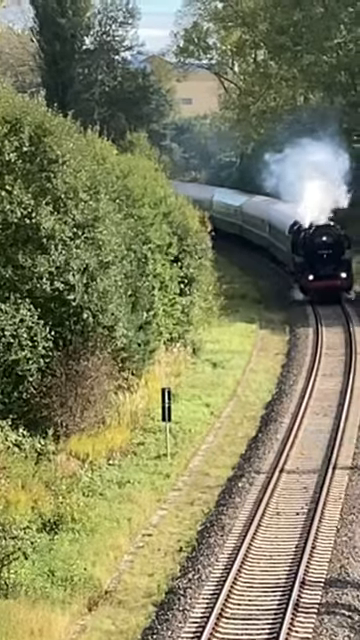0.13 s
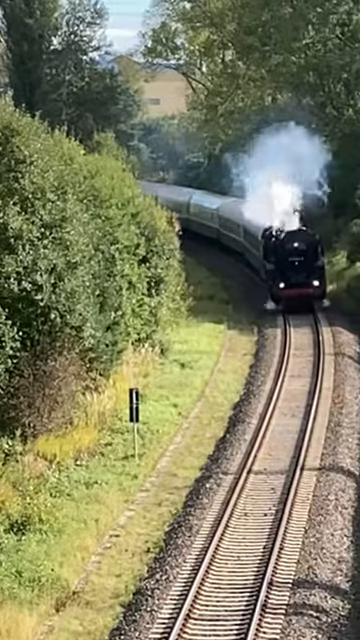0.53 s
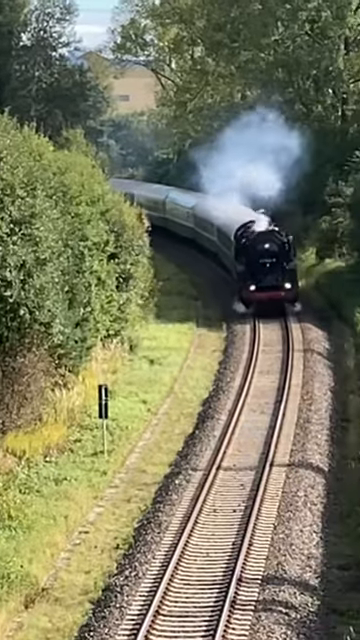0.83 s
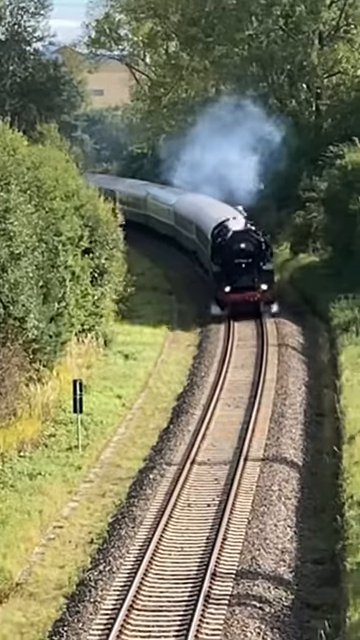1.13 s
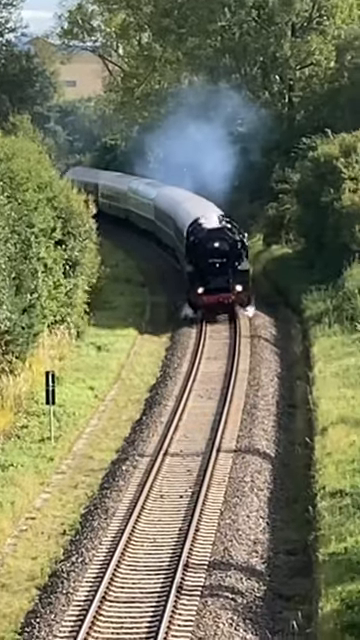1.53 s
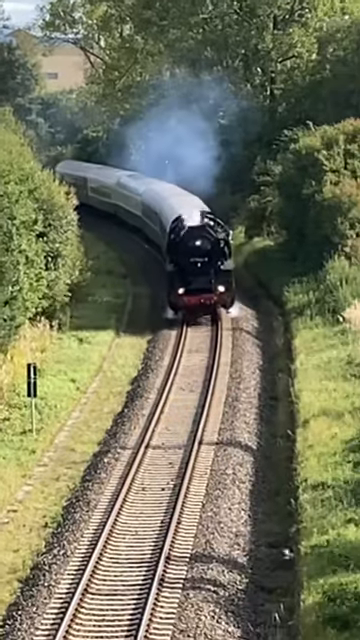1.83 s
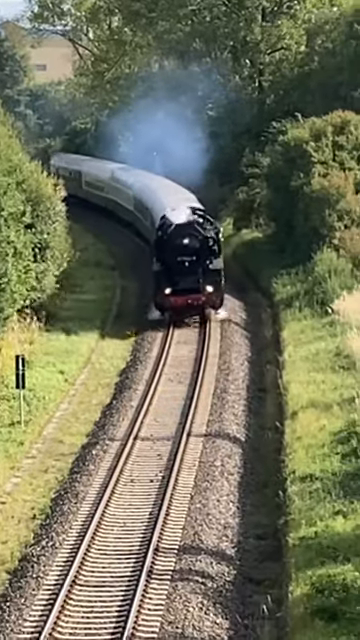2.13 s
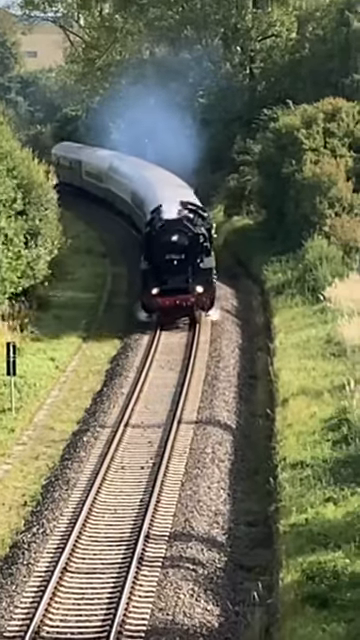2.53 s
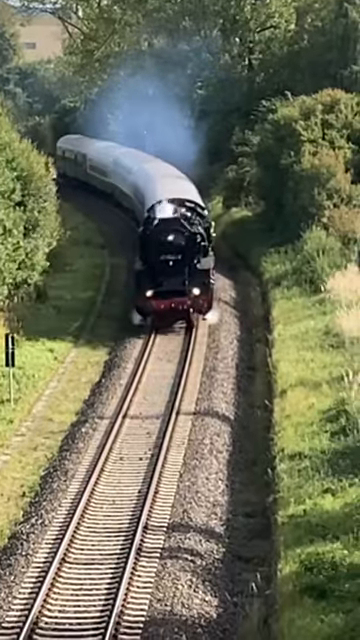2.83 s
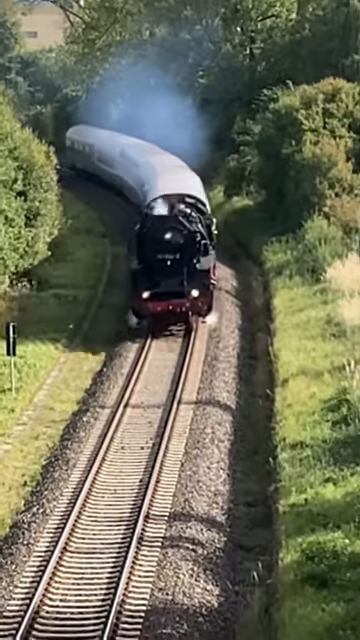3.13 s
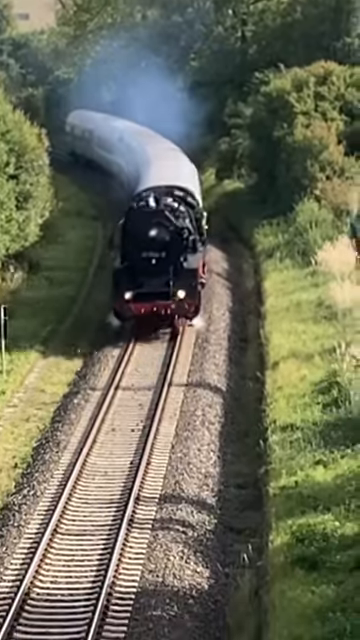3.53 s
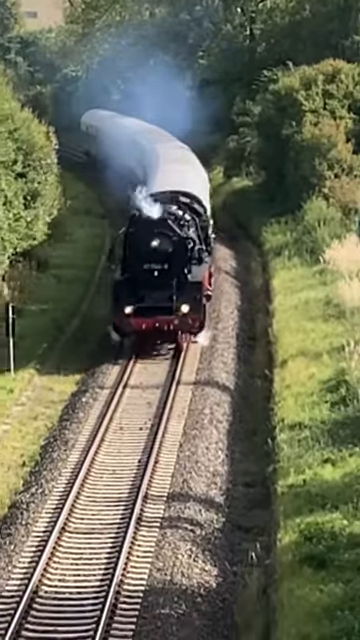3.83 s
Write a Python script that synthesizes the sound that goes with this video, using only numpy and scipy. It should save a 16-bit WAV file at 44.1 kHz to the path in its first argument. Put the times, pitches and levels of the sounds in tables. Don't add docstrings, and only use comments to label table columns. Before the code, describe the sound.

A steam locomotive's whistle blows at once, a hooting mid-pitched tone with hiss, dips and swells, stops after about a second and echoes off trees; then a much quieter rumble and steam hiss slowly approach outdoors.

```python
import sys
import numpy as np
from scipy import signal
from scipy.fft import rfft, irfft, next_fast_len
from scipy.io import wavfile
from scipy.ndimage import uniform_filter1d, map_coordinates

SR = 44100
rng = np.random.default_rng(int(sys.argv[2]) if len(sys.argv) > 2 else 0)


def ratio_of_db(decibels):
    return 10 ** (np.asarray(decibels, float) / 20)


def store_pcm(level_fs):
    pcm = np.round(np.clip(level_fs, -1, 1) * 32767).astype(np.int16)
    wavfile.write(sys.argv[1], SR, np.atleast_2d(pcm).T)


N = 176400
LEAD = 1
M = N + LEAD * SR

# (time [s], pitch [Hz], tone level [dB])
VALVE_OPENING = [
    (0, 451, -24),
    (.06, 451, -14.5),
    (.23, 451, -14),
    (.33, 450.8, -25),
    (.43, 451, -20.5),
    (.48, 440.5, -21),
    (.67, 437, -25.5),
    (.77, 455.6, -18),
    (.99, 456, -19),
]
# (time [s], level [dB])
JET_FLOW = [
    (0, -44),
    (.26, -41),
    (.45, -43.5),
    (.6, -51),
    (.7, -43.5),
    (.78, -39),
    (.9, -34),
    (.97, -47),
    (1.08, -89.5),
]
# (multiple of the fundamental [1], level under the tone [dB])
OVERTONES = [(2, -20), (3, -26.5), (4, -24.5), (5, -38.5), (7, -47), (9, -37), (10, -36.5), (11, -42)]
# (time [s], depth [dB], width [s])
TONE_NULLS = [(.115, 1.5, 0.01), (0.191, 3, 0.0062), (0.331, -1.5, 0.065), (0.476, 16, 0.023),
              (0.566, 8.5, 0.012), (.651, 12, 0.018), (0.694, 6.5, 0.006), (0.744, 3.5, 0.02),
              (0.767, -1.5, 0.029), (0.786, 4, 0.0059), (0.858, 7.5, .025), (0.956, 13.5, 0.023),
              (1.026, 10, 0.013), (1.058, 16.5, 0.0063), (1.123, 33.5, 0.0027)]
# (multiple [1], time [s], depth [dB], width [s])
OVERTONE_NULLS = [(2, 0.016, 2.5, .015), (2, .27, 2.5, 0.079), (2, 0.32, 14.5, .012), (2, 0.46, 4, .008),
                  (2, .625, 13, 0.022), (2, .76, 11.5, 0.033), (2, 1.03, 7.5, .012), (3, 0.055, 9, 0.019),
                  (3, .22, 12, 0.032), (3, 0.33, 6.5, 0.0072), (3, .485, 4.5, .015), (3, 0.52, 10, .03),
                  (3, 1.3, 14.5, 0.022), (3, 1.006, 5, 0.037), (4, 0.053, -1, .03), (4, 0.3, 3, .02),
                  (4, 0.72, 15.5, 0.084), (4, .92, 9, 0.018), (4, 0.84, 3.5, .02), (4, 0.88, 11.5, .03)]
# (frequency [Hz], density [dB per Hz])
JET_COLOUR = [(250, -6), (450, 10), (700, 3.5), (1300, 0.5), (2600, -5), (4500, -8), (5700, -15.5),
              (8200, -21.5)]
# (multiple of the fundamental [1], width [Hz], gain [dB])
BELL_MODES = [(4.3, 190, 5), (7, 42, 8.5), (9, 190, 4.5), (10, 180, 2.5), (11.05, 44, 7)]
# (frequency [Hz], t60 [s])
TREE_DECAY = [(300, 5.1), (450, 11), (900, 1.1), (4000, 1.33), (9000, 0.4)]
# (frequency [Hz], level [dB])
TREE_LEVEL = [(300, -13), (450, -25), (900, -16), (1800, 0), (4000, -9), (9000, -19)]
# (time [s], rumble level [dB], rolling level [dB], steam level [dB])
APPROACH = [(0, -37, -50, -53.5), (.75, -33.5, -44, -46), (1.4, -34, -56.5, -46.5), (1.9, -31, -49.5, -50),
            (2.2, -33.5, -50.5, -48.5), (2.55, -30, -53, -46.5), (2.62, -24, -45, -46.5),
            (2.74, -28.5, -40, -45), (2.85, -30.5, -49.5, -45), (3.2, -28, -48.5, -43.5),
            (3.4, -28, -43, -42.5), (3.6, -30, -37.5, -43), (3.8, -32, -40.5, -42), (4, -32.5, -53, -41)]
# (frequency [Hz], density [dB per Hz])
RUMBLE_COLOUR = [(20, -14), (35, -6.5), (60, -1), (110, -6.5), (150, -5.5), (190, 3), (240, -8),
                 (300, -31.5)]
# (frequency [Hz], density [dB per Hz])
ROLLING_COLOUR = [(300, -34), (430, -13), (500, 0), (620, -1), (720, -10), (850, -28), (1300, -24),
                  (1800, -30)]
# (frequency [Hz], density [dB per Hz])
STEAM_COLOUR = [(300, 10.5), (900, 1), (1700, 1), (2600, -5.5), (4900, -13.5), (5400, -22), (8300, -25),
                (16000, -5.5)]
# (time [s], peak level [dB], frequency [Hz])
ROD_THUMPS = [(1.449, -19.5, 186), (1.563, -31, 206), (1.733, -41.5, 194), (1.798, -26.5, 207),
              (2.034, -28.5, 183), (2.318, -21, 208.3), (2.385, -22.5, 184.6), (2.555, -18.5, 191),
              (2.607, -16, 176), (2.754, -31.5, 160.4), (2.788, -21, 177), (2.825, -24.5, 160.5),
              (2.9, -28.5, 184), (2.984, -17.5, 197.4), (3.075, -41, 193), (3.181, -27.5, 193),
              (3.216, -21.5, 171), (3.254, -25, 165), (3.432, -24, 203), (3.537, -32.5, 187),
              (3.696, -32.5, 191), (3.829, -26.5, 165)]
# (time [s], peak level [dB], frequency [Hz])
ROD_BEATS = [
    (2.25, -28, 58.4),
    (2.491, -30, 61.7),
    (2.769, -24, 95.6),
    (2.931, -21.5, 61.6),
    (3.096, -21.5, 54.2),
    (3.238, -27, 80.3),
    (3.503, -26, 62.5),
    (3.876, -24, 74.2),
]
# (time [s], peak level [dB], frequency [Hz])
RAIL_CLANKS = [
    (2.297, -32, 468),
    (2.59, -37, 580),
    (2.639, -30.5, 494),
    (2.723, -31, 520),
    (3.226, -29.5, 499),
    (3.331, -38, 593),
    (3.413, -30.5, 543),
    (3.483, -25.5, 518),
    (3.548, -26.5, 527),
    (3.912, -34, 514),
]
# (time [s], peak level [dB], frequency [Hz])
LINKAGE_TICKS = [(1.312, -56, 11000), (1.499, -55, 10300), (2.107, -56, 10000), (2.54, -60, 6900),
                 (2.693, -46, 10900), (2.831, -58, 10400), (3.207, -53, 10300), (3.298, -44, 11800),
                 (3.298, -36, 13600), (3.299, -36, 15200), (3.52, -54, 4500), (3.775, -50, 11500),
                 (3.81, -50, 4900), (3.813, -54, 6600), (3.813, -51, 11000), (3.901, -50, 11000),
                 (3.94, -46, 13500)]
# (frequency [Hz], density [dB per Hz])
HISS_COLOUR = [(3000, -16), (7000, -2), (16000, -0.5)]
# (frequency [Hz], left-right likeness [-1..1])
PORT_LIKENESS = [(60, .92), (240, .97), (480, .66), (970, .2), (1600, -.1), (2700, -.05), (5000, .4),
                 (7760, .5)]
# (frequency [Hz], gain [dB])
PHONE_COLOUR = [(22, -17), (32, 2), (1720, 0.5), (1800, -5), (5300, -2.5), (5650, -3), (6100, 2),
                (8400, -2.5)]
# (frequency [Hz], gain [dB])
SUM_GAPS = [(8400, 0.5), (8700, -39), (9400, -38.5), (9700, -11), (12300, -17), (13200, -42.5),
            (14300, -58), (14600, -25.5)]
# (frequency [Hz], gain [dB])
DIFFERENCE_GAPS = [(6700, 0), (7150, -26.5), (7600, 6), (9700, 3), (10800, -45), (11900, -46.5),
                   (12500, -8), (15000, -24.5)]

PORTS = np.array([[1], [-1]])


def whistle():
    hz, tone_db = curves(VALVE_OPENING)
    jet_db, = curves(JET_FLOW)
    phase = 2 * np.pi * np.cumsum(hz * (1 + .001 * wobble(60.95))) / SR
    tone = fundamental(phase, tone_db) + overtones(phase, jet_db)
    close_s, close_db_per_s = 1.0906, 387.5
    shut_db = -close_db_per_s * np.maximum(0, seconds() - close_s)
    jet = ratio_of_db(0.33 * wobble(15)) * steam_jet(phase, jet_db)
    return ratio_of_db(shut_db) * (np.sqrt(2) * tone + jet)


def fundamental(phase, tone_db):
    sag_s, sag_takes_s, sag_hz, sag_db = 1.03, .02, 27, 4
    sag = (1 + np.tanh((seconds() - sag_s) / sag_takes_s)) / 2
    low = phase - 2 * np.pi * sag_hz * np.cumsum(sag) / SR
    fade_db = 2.5 * wobble(28) - dips(TONE_NULLS)
    mid = ratio_of_db(fade_db) * np.sin(low)
    side = ratio_of_db(-12 + 2 * wobble(9.4)) * np.cos(low - wobble(2.2) / 4)
    return ratio_of_db(tone_db - 4 * 0 - sag_db * sag) * (mid + PORTS * side)


def overtones(phase, jet_db):
    tone = 0
    for k, db in OVERTONES:
        effort_db = 0.65 * (jet_db + 45.5) * min(1.5, .5 * (k - 2))
        null_db = dips([null[1:] for null in OVERTONE_NULLS if null[0] == k])
        level = ratio_of_db(effort_db - null_db - 15 + db + 1.6 * wobble(16))
        slip = .45 * wobble(29.73)
        port_turn = PORTS * (.22 * k + 0.15 * wobble(3.88))
        tone = tone + level * np.sin(k * phase + slip + port_turn)
    return tone


def steam_jet(phase, jet_db):
    def bell(hz):
        modes = 1
        for k, width, db in BELL_MODES:
            modes = modes + ratio_of_db(db) / (1 + ((hz - k * 462) / width * 2) ** 2)
        return ratio_of_db(along(JET_COLOUR, hz)) * modes / (1 + (hz / 11500) ** 8)

    pulsed = patchy(2.5) * (1 + 0.051 * np.cos(phase))
    jet = spread(filtered(pulsed, bell))
    jet = jet / np.std(filtered(jet, lambda hz: hz > 2500))
    top = filtered(jet, lambda hz: 1 / (1 + (2600 / (hz + 1)) ** 4))
    body = jet - top
    return ratio_of_db(jet_db + 6.5) * top + ratio_of_db(.3 * (jet_db + 37.5) - 40.5) * body


def trees(blow):
    stirred = (signal.hilbert(blow[0]) * np.exp(1j * 2.8 * wobble(25))).real
    hz, t, noise = signal.stft(rng.standard_normal((2, 3 * SR)), SR, nperseg=256)
    fall = ratio_of_db(-60 * t / along(TREE_DECAY, hz)[:, None])
    fall = fall / np.linalg.norm(fall, axis=1, keepdims=True)
    slope_s, slope_spread_s, slope_db, slope_hz = 0.619, 0.14, -17.5, 900
    bunch = np.exp(-((t - slope_s) / slope_spread_s) ** 2)
    slope = ratio_of_db(slope_db) * bunch / (1 + (hz[:, None] / slope_hz) ** 2) / np.linalg.norm(bunch)
    shape = ratio_of_db(along(TREE_LEVEL, hz))[:, None] * fall + slope
    tail = signal.istft(noise * shape, SR, nperseg=256)[1] / np.sqrt(128)
    return spread(signal.fftconvolve(stirred[None], tail, axes=1)[:, :M])


def train():
    rumble_db, rolling_db, steam_db = curves(APPROACH)
    rumble = ratio_of_db(rumble_db - 3.5 + .4 * wobble(12)) * rush(RUMBLE_COLOUR, patchy_db=.8)
    rolling = ratio_of_db(rolling_db) * rush(ROLLING_COLOUR, patchy_db=1.3)
    steam = ratio_of_db(steam_db + .8 * wobble(9)) * rush(STEAM_COLOUR, patchy_db=1.8)
    return rumble + rolling + steam


def knocks():
    out = np.zeros((2, M + SR))
    t = np.arange(SR // 4) / SR
    # (impacts, t60 [s], rise [s], gain [dB])
    kinds = [(ROD_THUMPS, 0.077, 0.0095, 0.5), (ROD_BEATS, 0.11, 0.019, 5.5),
             (RAIL_CLANKS, 0.042, 0.0015, -5.5)]
    for impacts, t60, rise, gain_db in kinds:
        for s, db, hz in impacts:
            ring = 2 * np.sin(2 * np.pi * hz * t)
            place(out, s, ratio_of_db(db + gain_db - 60 * t / t60) * (1 - np.exp(-t / rise)) * ring)
    ticks(out, t)
    return out[:, :M]


def ticks(out, t):
    for s, db, hz in LINKAGE_TICKS:
        grit = uniform_filter1d(rng.standard_normal(len(t)), size=16) * 4
        envelope = ratio_of_db(db - 60 * t / .045) * (1 - np.exp(-t / .005))
        place(out, s, envelope * grit * np.sin(2 * np.pi * hz * t) * (1 + .6 * PORTS))


def hiss_floor():
    return ratio_of_db(-114) * rush(HISS_COLOUR, patchy_db=-1.5)


def rush(spectrum, patchy_db):
    def colour(hz):
        low_edge = np.minimum(1, hz / spectrum[0][0]) ** 4
        high_edge = np.minimum(1, spectrum[-1][0] / (hz + 1)) ** 6
        return ratio_of_db(along(spectrum, hz)) * low_edge * high_edge

    return unit(spread(filtered(patchy(patchy_db), colour)))


def patchy(depth_db):
    noise = signal.stft(rng.standard_normal((2, M)), nperseg=512)[2]
    field = uniform_filter1d(rng.standard_normal(noise.shape[1:]), 4, 0)
    field = uniform_filter1d(field, 12, 1)
    return signal.istft(noise * ratio_of_db(depth_db * unit(field)), nperseg=512)[1][:, :M]


def spread(pair):
    def mid_side(hz):
        turn = np.arccos(np.clip(along(PORT_LIKENESS, hz), -1, 1)) / 2
        return np.array([np.cos(turn), np.sin(turn)])

    mid, side = filtered(pair, mid_side)
    return np.array([mid + side, mid - side])


def filtered(x, response):
    m = next_fast_len(M + SR // 2)
    return irfft(rfft(x, m) * response(np.fft.rfftfreq(m, 1 / SR)), m)[..., :M]


def wobble(rate):
    at = np.arange(0, M + 64, 64)
    knots = rng.standard_normal(400)
    return np.interp(np.arange(M), at, map_coordinates(knots, [at * min(rate, 70) / SR]))


def dips(nulls):
    t = seconds()
    return sum(db * np.exp(-((t - s) / width) ** 2) for s, db, width in nulls)


def place(out, s, sound):
    start = round((s + LEAD) * SR)
    out[:, start:start + sound.shape[-1]] += sound


def seconds():
    return np.arange(M) / SR - LEAD


def curves(rows):
    s, *columns = np.transpose(rows)
    return [np.interp(seconds(), s, column) for column in columns]


def along(points, hz):
    f, value = np.transpose(points)
    return np.interp(np.log(hz + 1), np.log(f + 1), value)


def unit(x):
    return x / np.sqrt(np.mean(x ** 2) + 1e-20)


def scene():
    blow = whistle()
    return (blow + trees(blow) + train() + knocks() + hiss_floor())[:, LEAD * SR:]


def top_cut(x):
    return signal.sosfilt(signal.butter(12, 15720, fs=SR, output="sos"), x)


def record(dry):
    hz = np.fft.rfftfreq(M, 1 / SR)
    pad = LEAD * SR // 2
    pair = np.array([dry[0] + dry[1], dry[0] - dry[1]]) / 2
    pair = np.pad(pair, ((0, 0), (pad, pad)), "reflect")
    gaps = np.array([along(SUM_GAPS, hz), along(DIFFERENCE_GAPS, hz)])
    passed = [hz >= 0, hz < 15100]
    colour = ratio_of_db(along(PHONE_COLOUR, hz) + gaps) * passed
    mid, side = irfft(rfft(pair) * colour, M)[:, pad:][:, :N]
    return top_cut(np.array([mid + side, mid - side]))


dry = scene()
out = record(dry)
store_pcm(out)
```